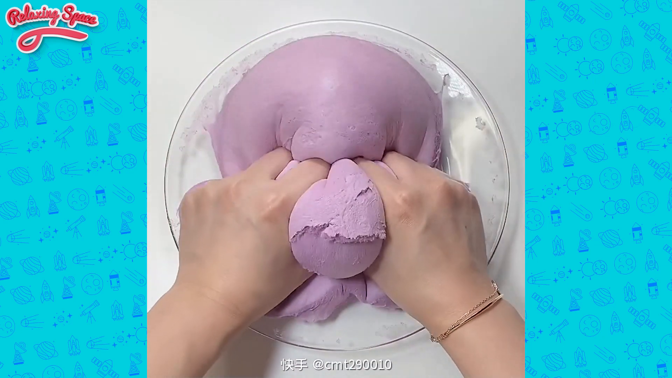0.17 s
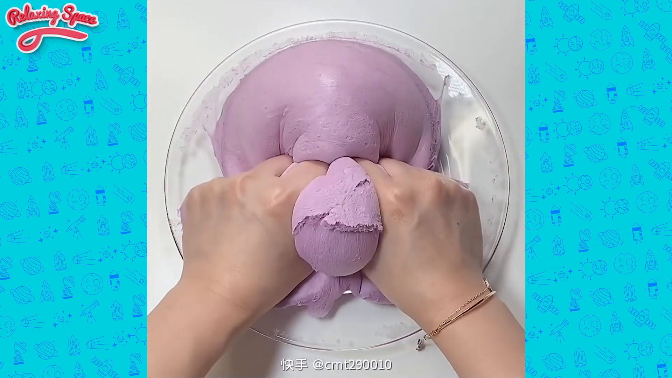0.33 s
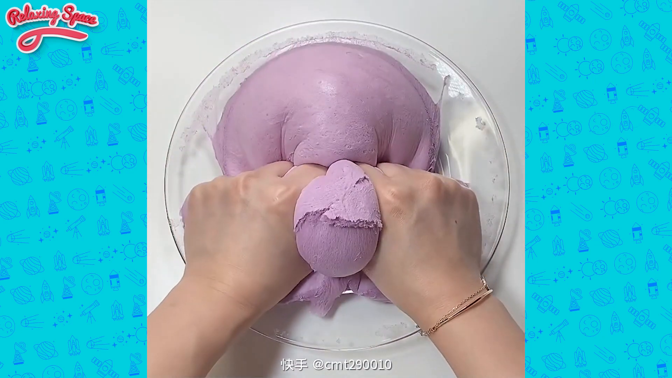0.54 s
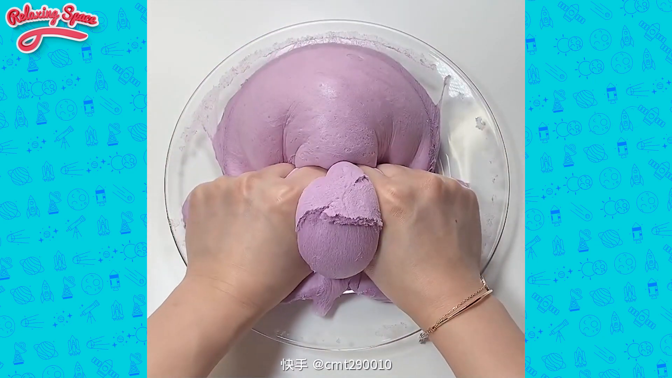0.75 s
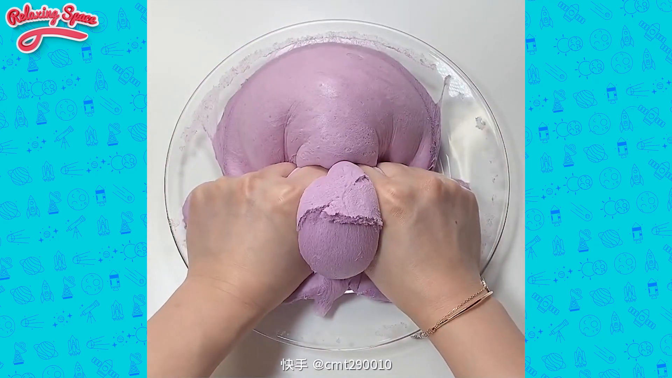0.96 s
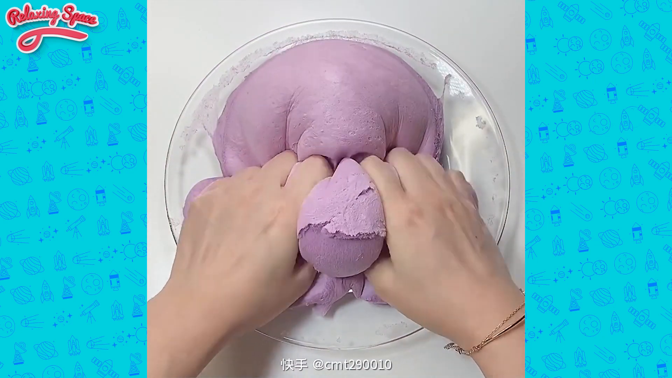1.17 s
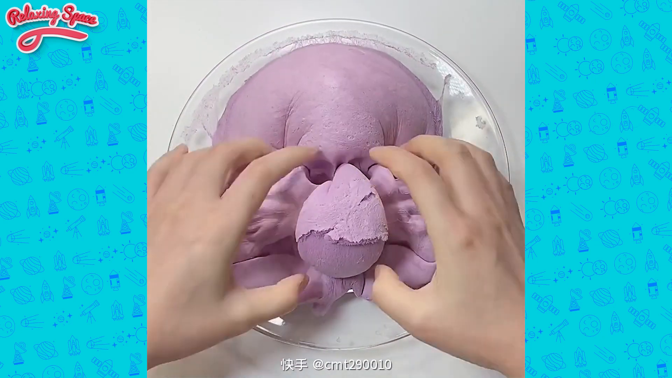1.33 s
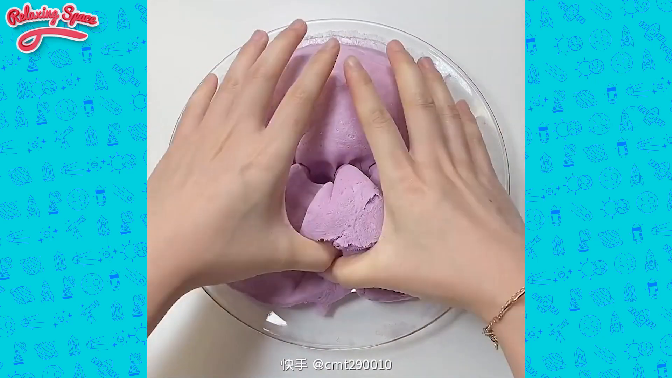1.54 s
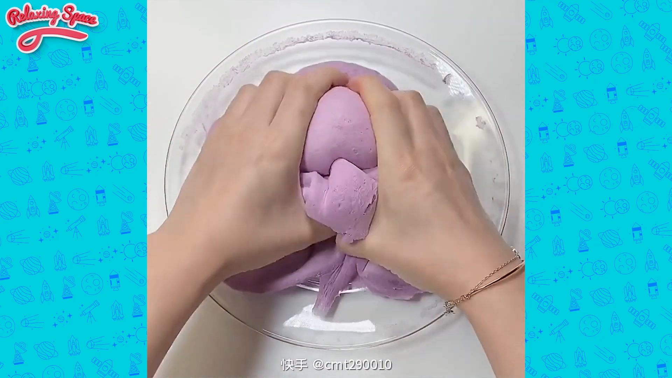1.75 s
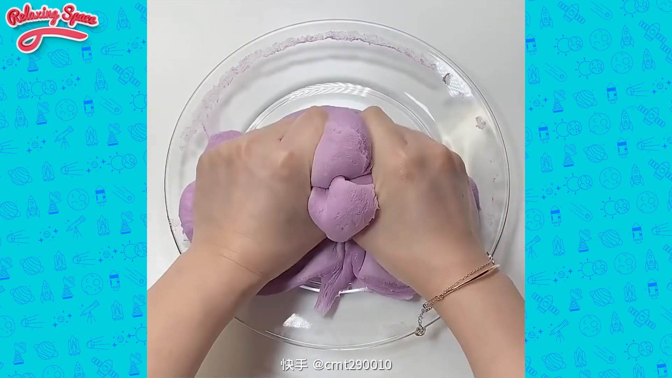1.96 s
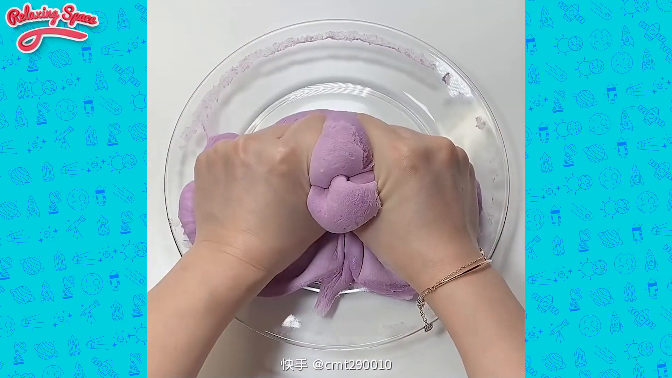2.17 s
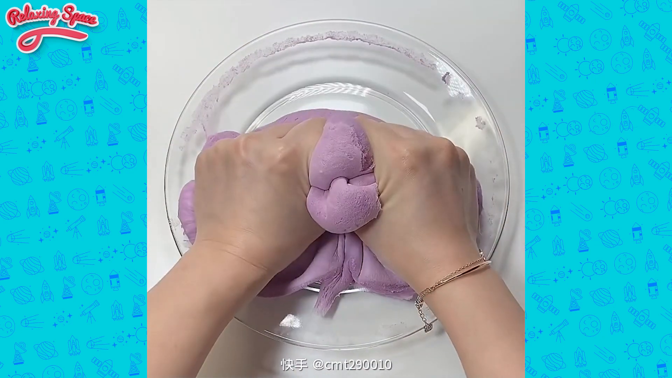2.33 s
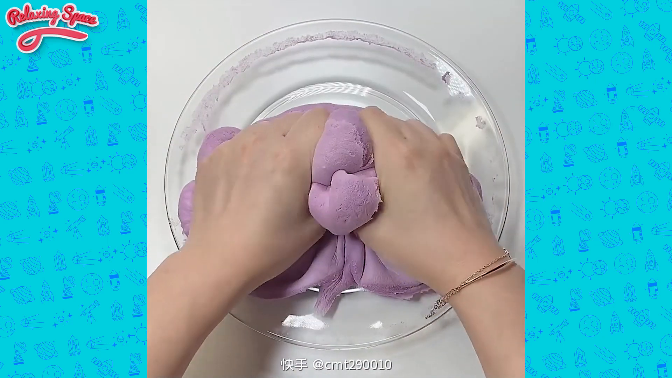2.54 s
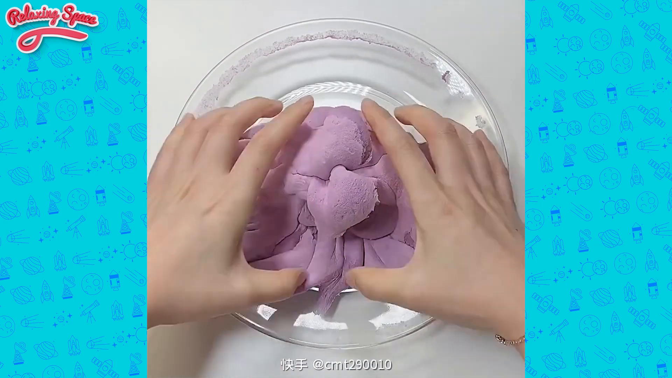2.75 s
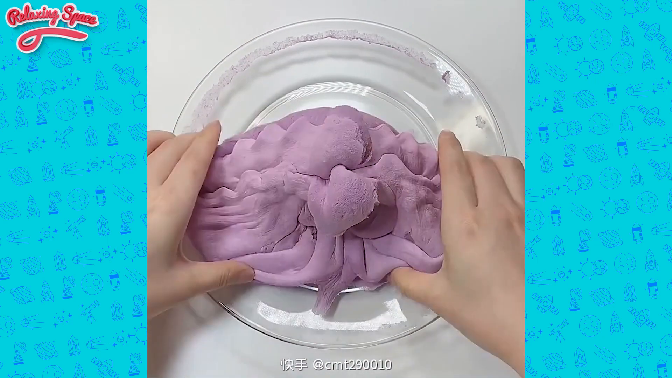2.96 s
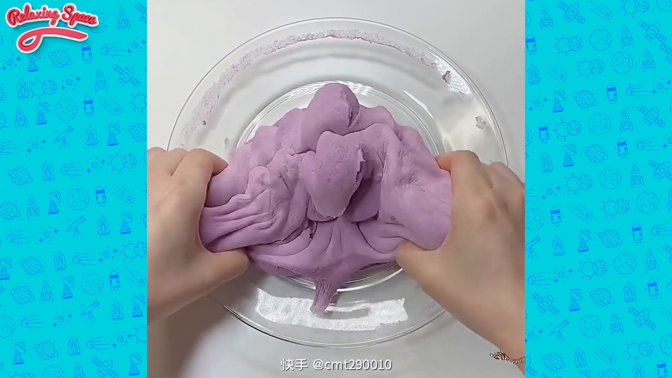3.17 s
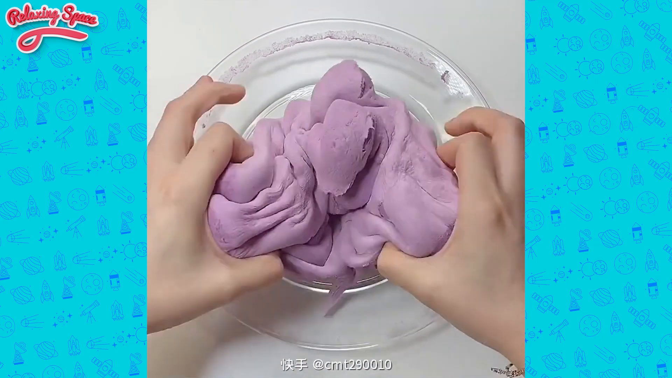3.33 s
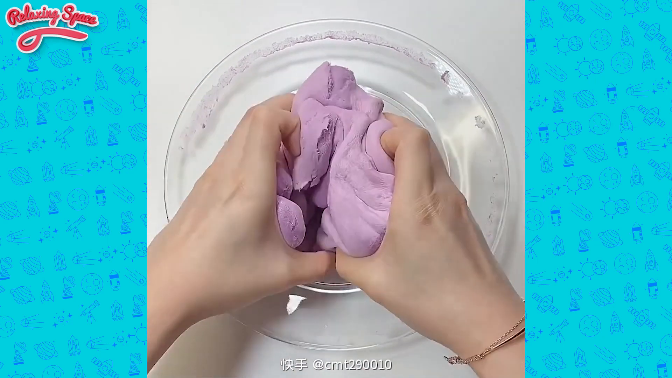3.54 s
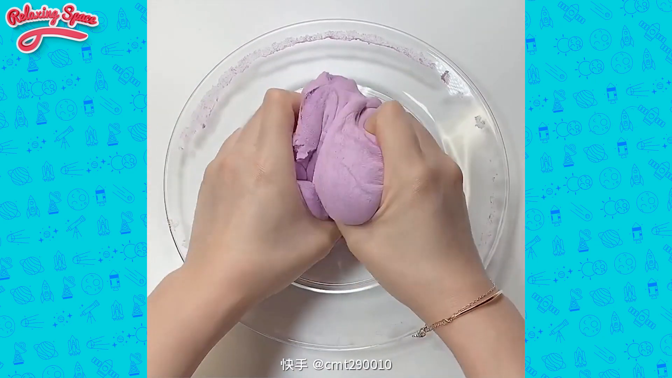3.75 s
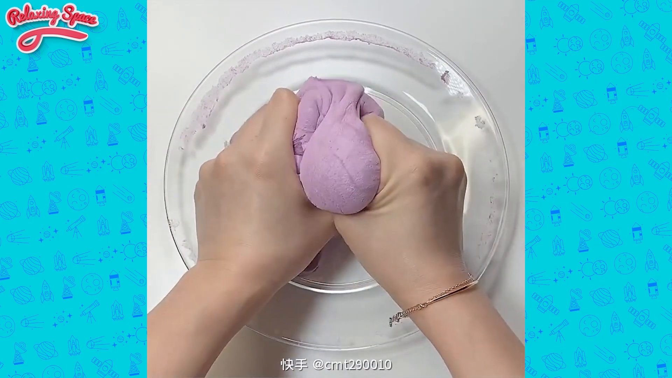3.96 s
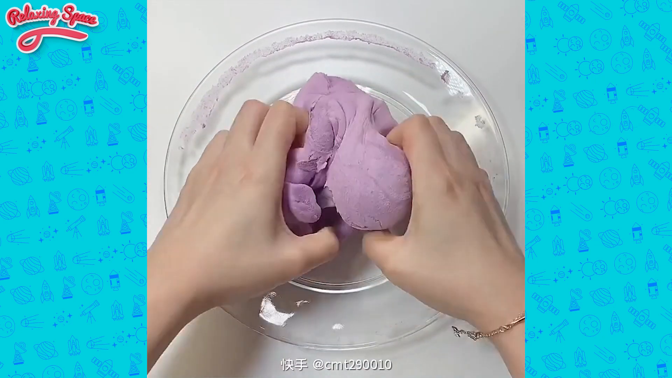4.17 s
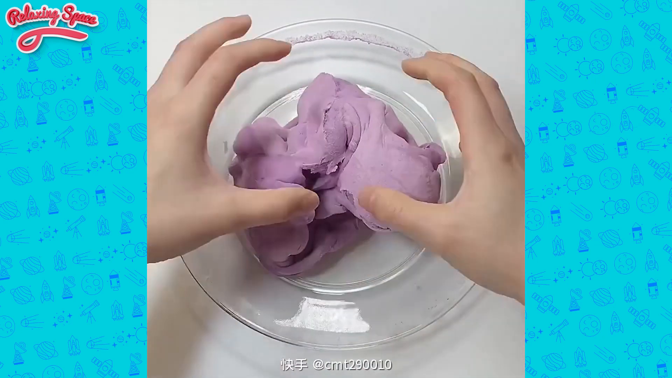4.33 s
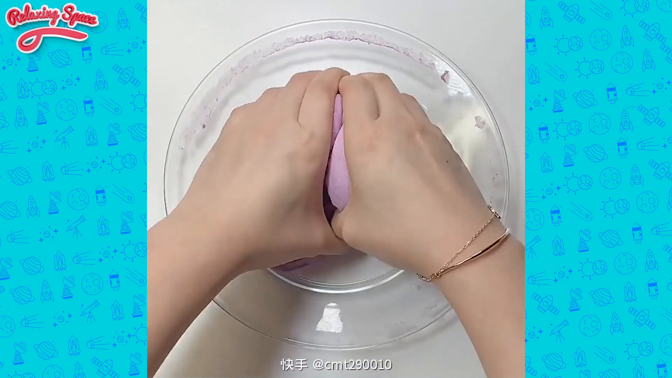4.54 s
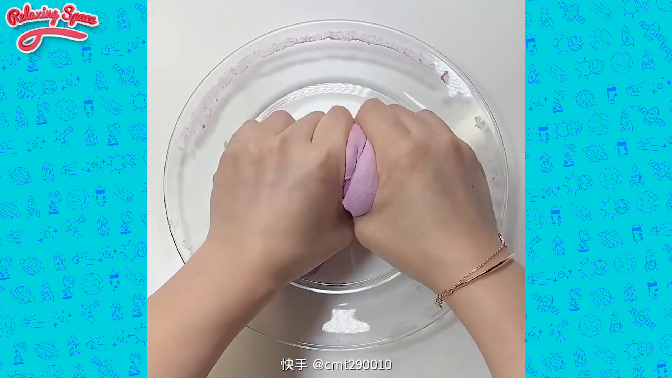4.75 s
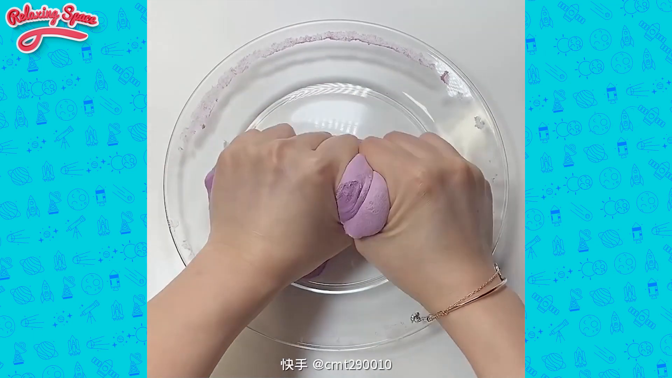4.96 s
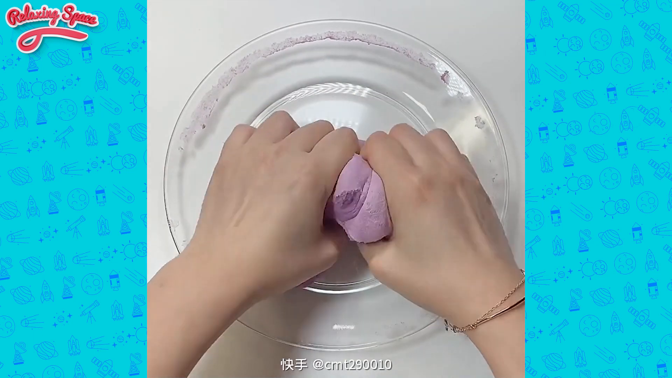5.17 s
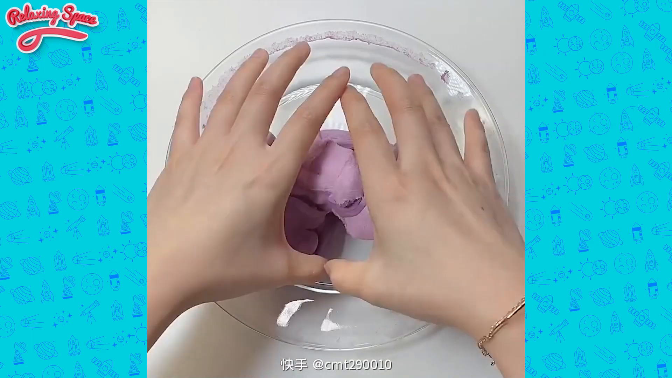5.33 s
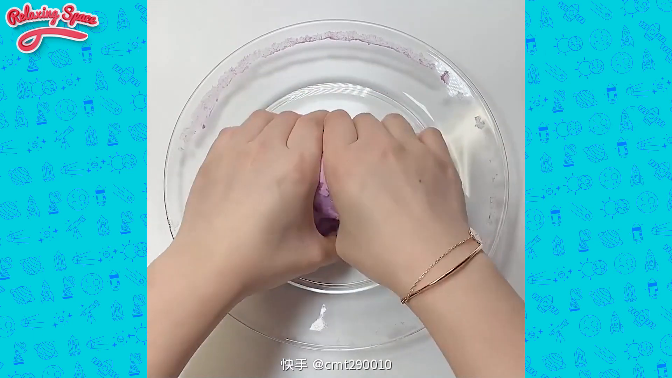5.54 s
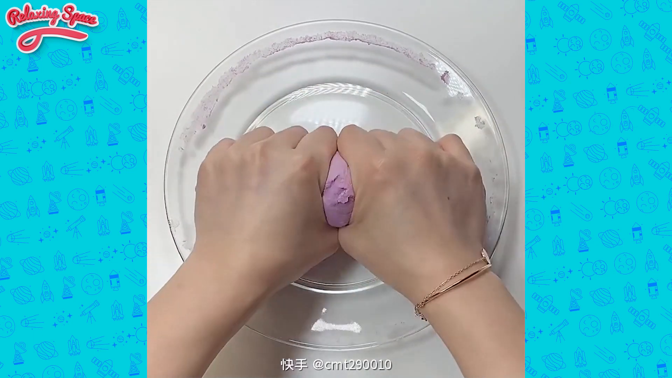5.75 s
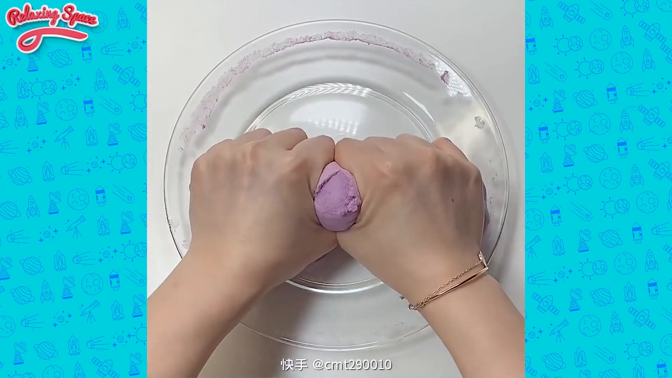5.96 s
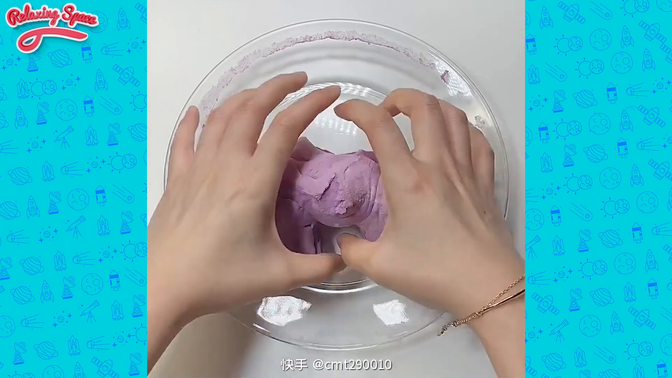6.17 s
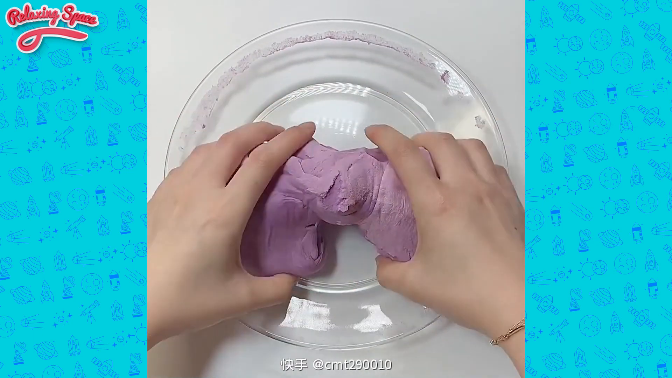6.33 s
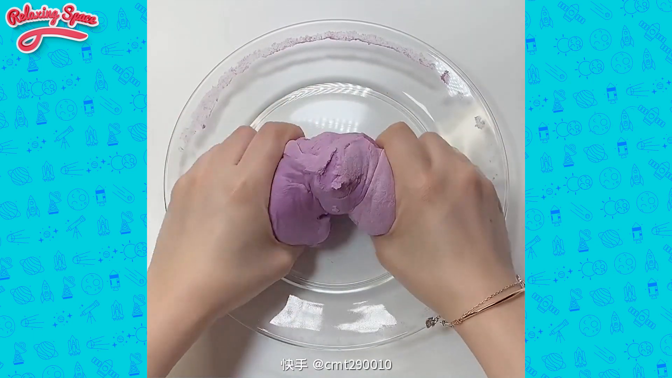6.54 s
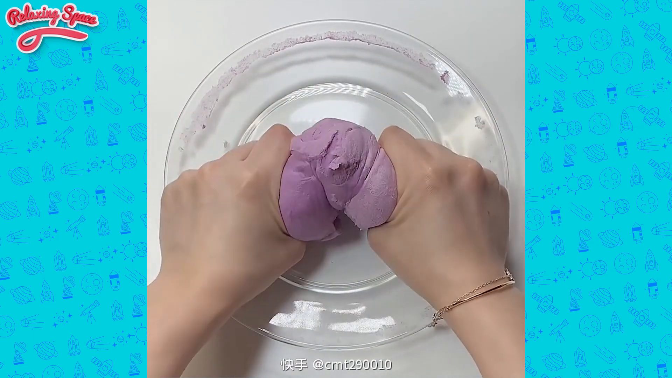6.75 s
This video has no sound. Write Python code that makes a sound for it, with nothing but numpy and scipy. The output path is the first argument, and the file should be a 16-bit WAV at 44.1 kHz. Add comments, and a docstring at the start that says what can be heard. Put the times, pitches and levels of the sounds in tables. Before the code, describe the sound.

Close, dry kneading of puffy slime, with crackly hissing presses, sticky low peels, snapping air pockets and a few damped rattles of the glass plate.

```python
"""Foam fizzes and rasps at once as two hands knead air-puffed slime on a glass plate, over a faint hush.
Filtered random clicks make the bursting cells and the squelch of skin peeling free; filtered noise the table rumble.
Air pockets pop as noise through cavity and slit resonances, and a thin gliding sine whistles from a pinhole.
Lumps land as short sagging sines; jolts of the plate are noise chatter with a sum of decaying glass modes.
A small furnished room adds quick desk echoes and a short tail."""
import sys
import numpy as np
from scipy import signal
from scipy.fft import rfft, irfft
from scipy.io import wavfile
from scipy.ndimage import uniform_filter1d

SR = 44100
rng = np.random.default_rng(int(sys.argv[2]) if len(sys.argv) > 2 else 0)


def persist_wave(psi):
    """Save psi, clipped to +-1, as 16-bit WAV."""
    counts = np.round(np.clip(psi, -1, 1) * 32767).astype(np.int16)
    wavfile.write(sys.argv[1], SR, np.atleast_2d(counts).T)


N = 299880
TIME = np.arange(N) / SR
LET_GO_DB_PER_S = 336.5  # fall of the foam's sound in a release or a finger stir

# The hands close and press. Each row: start in seconds, hold in seconds, then relative levels of fizz (finest
# cells), rasp (coarser cells) and squelch in dB, swell during the hold in dB, dying away in dB per second,
# small air pockets in dB.
SQUEEZES = [(0.0, 0.026, -32.5, -31.5, -36, 1, 38, -48), (1.611, 0.19, -33.5, -35, -41.5, 5.5, 61, -28.5),
            (2.848, 0.24, -39, -44, -48, 4.5, 53.5, -45), (3.48, 0.474, -39.5, -41, -50.5, 1.5, 263, -44.5),
            (4.547, .47, -39, -38.5, -45, 0.5, 52.5, -34.5), (5.535, 0.26, -41, -42, -49.5, 8.5, 86, -37),
            (6.466, 0.15, -37, -38.5, -43.5, 2.5, 54, -36)]
# Slime lands or pulls free. Each row: start in seconds, level in dB before channel balance, nominal pitch in Hz,
# nominal length in seconds.
THUMPS = [(1.198, -27, 182, 0.015), (1.246, -21, 372, 0.024), (1.283, -21.5, 441, 0.019),
          (1.327, -25.5, 58.6, .027), (1.46, -38, 54.4, 0.062), (1.826, -15, 66, 0.012),
          (2.624, -16, 320, 0.019), (2.851, -15.5, 112, 0.019), (3.52, -32, 128, 0.014),
          (4.169, -14.5, 398, 0.0088), (4.193, -15, 385, 0.014), (4.211, -13.5, 129, 0.027),
          (5.171, -21, 362, 0.018), (5.208, -19.5, 323, 0.024), (5.257, -19.5, 400, 0.0092),
          (5.533, -31.5, 203, 0.024), (6.142, -20, 240, 0.025), (6.183, -19, 312, 0.01),
          (6.255, -20, 110, 0.024), (6.321, -12, 199, 0.035), (6.339, -16, 216, 0.021),
          (6.366, -22, 350, 0.021)]
# Stereo difference of foam and chatter. Each row: frequency in Hz, side minus mid in dB.
SPREAD = [(200, -5), (550, -1), (900, 5.5), (1400, -58.5), (2500, -4), (5000, -4.5), (8000, -1),
          (15000, -13.5)]


def undb(db):
    """Decibels to gain."""
    return 10 ** (np.asarray(db) / 20)


def unit(x):
    """Scale to rms 1."""
    return x / np.sqrt(np.mean(x ** 2))


def shape(x, spectrum):
    """Filter by a curve of (Hz, dB) points that falls away beyond its ends."""
    hz, db = np.transpose(spectrum)
    f = np.maximum(np.fft.rfftfreq(x.shape[-1], 1 / SR), 1)
    skirt = np.minimum(f / hz[0], 1) ** 2 * np.minimum(hz[-1] / f, 1) ** 2
    gain = skirt * undb(np.interp(np.log(f), np.log(hz), db))
    return irfft(rfft(x) * gain, x.shape[-1])


def colour(x, spectrum):
    """Give a signal a spectrum, at rms 1."""
    return unit(shape(x, spectrum))


def resonate(x, hz, q):
    """One damped resonance, at rms 1; pitch is capped and q has a floor that rises with pitch."""
    hz = min(hz, .4 * SR)
    b, a = signal.iirpeak(hz, max(q, 2.5 * hz / SR), fs=SR)
    return unit(signal.lfilter(b, a, x))


def add(out, s, sound):
    """Mix a sound in at a time in seconds."""
    i = max(int(s * SR), 0)
    out[..., i:i + sound.shape[-1]] += sound[..., :max(N - i, 0)]


def bursts(rate, spread_db):
    """Random clicks at a rate per second, with exponentially scattered dB sizes."""
    size = undb(spread_db * np.minimum(rng.exponential(size=N), 5))
    sign = rng.choice([-1, 1], N)
    return size * sign * (rng.random(N) < rate / SR)


def walk(rate):
    """Random wander: normal knots at a rate per second, joined by straight lines."""
    knots = rng.standard_normal(4096)
    return np.interp(TIME * rate, np.arange(len(knots)), knots)


def mid_side(mid, side):
    """Two microphones from mid and side, the side shaped by SPREAD."""
    side = shape(side, SPREAD)
    return np.array([mid + side, mid - side])


def widen(x, width, scatter_s):
    """Hands and plate scatter a sound, so that it reaches the two microphones a little differently."""
    t = TIME[:1024]
    scatter = rng.standard_normal(len(t)) * np.exp(-t / scatter_s)
    side = signal.fftconvolve(x, scatter / np.linalg.norm(scatter))[:len(x)]
    return np.array([x + width * side, x - width * side])


def ramp(s, hold, rise_db_per_s, fall_db_per_s):
    """Gain that climbs to 1 at a time, holds, then dies away."""
    rise_db = rise_db_per_s * np.maximum(s - TIME, 0)
    fall_db = fall_db_per_s * np.maximum(TIME - s - hold, 0)
    return undb(-np.minimum(rise_db + fall_db, 150))


def gesture(s, hold, rise_db_per_s, fall_db_per_s, lead_s, lead_db):
    """A move of the hands, announced by a lighter stir of the fingers."""
    stir = ramp(s - lead_s, lead_s, rise_db_per_s, LET_GO_DB_PER_S) * undb(lead_db)
    return np.maximum(stir, ramp(s, hold, rise_db_per_s, fall_db_per_s))


def kneading():
    """How hard the hands work the slime: gains of fizz, rasp, squelch and table rumble, summed in power."""
    # The fingers open and pull out. Each row: start in seconds, hold in seconds, then relative levels of fizz,
    # rasp, squelch and table rumble in dB, and the first slackening relative to the full pull in dB.
    releases = [(1.136, 0.15, -37.5, -34, -28.5, -33, -19), (2.601, 0.096, -38, -32, -24.5, -28.5, -15),
                (3.085, 0.082, -42, -28.5, -30, -30, -9), (3.238, 0.056, -35.5, -33.5, -32, -40, -12),
                (4.134, 0.089, -34.5, -31.5, -25, -39, -9), (5.165, 0.089, -35.5, -32, -31, -34.5, -22),
                (6.092, 0.052, -31, -29, -25, -30, -12)]
    rest_fizz_db, rest_rasp_db, lean_db = -70, -62, -49.5  # foam left alone; arms resting on the table
    grip_db_per_s, touch_s, touch_db = 250, 0.061, -13  # fingers find their grip just before each squeeze
    squelch_steepness, squeeze_rumble_db = 1.49, -3.5  # dB slopes relative to fizz; rumble relative to squelch
    pull_db_per_s, loosen_s = 261, .14  # the grip slackens this long before each release
    rasp_lag_s, rasp_loosen_db = 0.0095, -5.5  # coarse cells follow the fine ones and stir less at first
    unstick_db_per_s, unstuck_db_per_s, squelch_hold = 197.5, 225.5, 0.41  # hold as a share of the release
    shift_lag_s, shift_db_per_s = 0.045, 157  # the hands' weight shifts after mid-release
    impact_db_per_s, settle_db_per_s = 1996, 133
    settle_rumble_db, settle_squelch_db = -12.5, -20  # relative to the thump
    heavy_hz = 173  # thumps below this pitch shake the table fully

    fine, coarse, weight = ([np.full(N, undb(db))] for db in (rest_fizz_db, rest_rasp_db, lean_db))
    peel = []
    for s, hold, fizz_db, rasp_db, squelch_db, swell_db, fall_db_per_s, _ in SQUEEZES:
        press = gesture(s, hold, grip_db_per_s, fall_db_per_s, touch_s, touch_db)
        swell = undb(swell_db * np.clip((TIME - s) / hold, 0, 1))
        fine.append(press * swell * undb(fizz_db))
        coarse.append(press * swell * undb(rasp_db))
        peel.append(press ** squelch_steepness * swell * undb(squelch_db))
        weight.append(press * swell * undb(squelch_db + squeeze_rumble_db))
    for s, hold, fizz_db, rasp_db, squelch_db, rumble_db, loosen_db in releases:
        pull = (hold, pull_db_per_s, LET_GO_DB_PER_S, loosen_s)
        fine.append(gesture(s, *pull, loosen_db) * undb(fizz_db))
        coarse.append(gesture(s + rasp_lag_s, *pull, loosen_db + rasp_loosen_db) * undb(rasp_db))
        middle, stuck = s + hold / 2, hold * squelch_hold
        unstick_at = middle + rasp_lag_s - stuck / 2
        peel.append(ramp(unstick_at, stuck, unstick_db_per_s, unstuck_db_per_s) * undb(squelch_db))
        weight.append(ramp(middle + shift_lag_s, 0, shift_db_per_s, shift_db_per_s) * undb(rumble_db))
    for s, db, hz, length in THUMPS:
        peel.append(ramp(s, length, impact_db_per_s, unstuck_db_per_s) * undb(db + settle_squelch_db))
        heavy = min(heavy_hz / hz, 1) ** 2
        settle = ramp(s, length, impact_db_per_s, settle_db_per_s)
        weight.append(settle * undb(db + settle_rumble_db) * heavy)
    return [np.linalg.norm(parts, axis=0) for parts in (fine, coarse, peel, weight)]


def hush():
    """Faint room air: steady noise with its own spectrum."""
    # Each row: frequency in Hz, relative density in dB per Hz.
    air_spectrum = [(15, -31), (30, 8), (50, 13), (86, 3), (450, -5), (558, -28), (2130, -14), (4750, -81),
                    (5720, -18), (9270, -82), (12400, -25), (15000, -9.5)]
    air = colour(rng.standard_normal(N), air_spectrum)
    return widen(air, width=0.5, scatter_s=.008) * undb(-56.5)


def cells(rate, spread_db, spectrum):
    """A cloud of bursting cells, spread over the whole lump between the two hands."""
    mid, side = (colour(bursts(rate, spread_db) / np.sqrt(rate), spectrum) for _ in range(2))
    return mid_side(mid, side)


def foam(fine, coarse):
    """Cells burst by the thousand, the more the harder the squeeze, in uneven surges; some tick and crackle."""
    # Each row: frequency in Hz, relative density in dB per Hz.
    fine_spectrum = [(2500, -29.5), (4000, 2.5), (4900, -1.5), (6200, 3), (9000, -3.5), (12000, 1),
                     (14000, -1.5), (16000, -5.5)]
    coarse_spectrum = [(300, -2), (700, -5.5), (1200, -3), (1700, 0.5), (2300, 2), (3100, -1),
                       (4200, -10.5), (7000, -11.5)]
    pressure = np.sqrt(fine / fine.max())
    surge = undb(1.0 * walk(rate=49))
    fizz = cells(2000 + 12000 * pressure, spread_db=-1.0, spectrum=fine_spectrum)
    rasp = cells(1800 + 7000 * pressure, spread_db=0.0, spectrum=coarse_spectrum)
    ticks = cells(60 + 150 * pressure, spread_db=5.5, spectrum=fine_spectrum)
    crackle = cells(120 + 300 * pressure, spread_db=4.5, spectrum=coarse_spectrum)
    fine_foam = (fizz * undb(-1.0) + ticks * undb(-11.5)) * fine
    coarse_foam = (rasp * undb(-1.2) + crackle * undb(-8)) * coarse
    return surge * (fine_foam + coarse_foam)


def squelch(peel):
    """Sticky skin lets go in small jerks that come in bunches, each opening a soft, low cavity."""
    # Each row: frequency in Hz, relative density in dB per Hz.
    jerk_spectrum = [(70, 1), (140, -8), (210, 0.5), (300, 1), (420, 1.5), (600, -8.5), (850, -11.5),
                     (1400, -12), (2600, -30)]
    bunching = undb(3.2 * walk(rate=80))
    jerks = colour(bursts(rate=800, spread_db=1.8), jerk_spectrum) * bunching
    balance = undb(np.array([[-1.6], [1.2]]))
    return widen(jerks * peel * undb(-1.5), width=0.14, scatter_s=0.00036) * balance


def heave(weight):
    """The table rumbles under the shifting hands: low noise that follows their weight."""
    # Each row: frequency in Hz, relative density in dB per Hz.
    table_spectrum = [(20, -45.5), (35, -14), (52, 1), (85, 1), (130, -2), (200, -11), (400, -26),
                      (900, -62)]
    rumble = colour(rng.standard_normal(N), table_spectrum)
    return widen(rumble * weight * undb(0.5), width=0.24, scatter_s=0.011)


def small_pops():
    """Little pockets of varied size give way at uneven moments in every squeeze; rows as for large pops."""
    pockets_per_s, scatter_db = 36, 4.5
    usual_cavity_hz, usual_spray_hz, length_s = 2530, 6800, .0015
    rows = []
    for s, hold, *_, db in SQUEEZES:
        ages = (np.arange(20) + rng.random(20)) / pockets_per_s
        for age, (cavity, spray, size) in zip(ages, rng.standard_normal((20, 3))):
            if age < hold:
                pitch = np.exp(0.13 * size)
                cavity_db = db - 1 + scatter_db * cavity
                spray_db = db + scatter_db * spray
                rows.append((s + age, cavity_db, usual_cavity_hz * pitch,
                             spray_db, usual_spray_hz * pitch, length_s))
    return rows


def pops():
    """A pocket tears open: the outflow rings its cavity and sprays through the slit, then dies quickly."""
    # Large pockets. Each row: start in seconds, cavity level in dB, cavity pitch in Hz, spray level in dB,
    # spray pitch in Hz, nominal outflow length in seconds. Levels are relative.
    large_pockets = [(0.815, -45.5, 500, -49, 7190, 0.0013), (0.985, -48, 1820, -43, 7300, 0.0013),
                     (1.813, -18, 1310, -24, 4560, 0.0093), (1.968, -29.5, 950, -51, 4490, .0044),
                     (2.6255, -16, 590, -32.5, 4600, 0.0032), (2.6795, -15, 1090, -55, 4000, 0.0042),
                     (3.466, -36, 2060, -32, 5420, 0.0018), (3.6838, -30, 2760, -23, 10300, 0.00094),
                     (3.904, -42, 1570, -21.5, 13700, 0.0021), (3.9131, -23.5, 1320, -18, 4800, 0.0028),
                     (3.921, -22, 400, -22, 6160, .0017), (3.941, -31.5, 3215, -24.5, 6480, 0.0023),
                     (4.1895, -23, 590, -18, 3640, 0.0017), (4.7585, -17.5, 2450, -23, 3960, 0.0014),
                     (4.79, -36, 2870, -29, 6460, .005), (4.8594, -29, 2640, -22.5, 6430, 0.002),
                     (4.975, -2.5, 1930, -2.5, 12520, 0.0012), (4.978, -10, 363.2, -17.5, 13800, 0.0021),
                     (4.99, -22.5, 2400, -27, 10600, 0.005), (5.495, -39, 3300, -34.5, 4670, 0.0014),
                     (5.635, -28, 2070, -39, 7680, 0.0015), (5.656, -24, 2370, -14, 11100, 0.0034),
                     (5.6978, -28, 2280, -20.5, 11200, 0.0032), (5.7143, -32, 2350, -20.5, 11200, 0.0058),
                     (5.767, -22, 2250, -16, 12900, 0.0055), (5.8172, -31, 2940, -24, 6120, .004),
                     (5.862, -17, 2360, -16.5, 6350, 0.0015), (5.874, -17, 2470, -9, 11400, 0.0049),
                     (5.89, -22, 2270, -16, 11700, 0.0072), (6.1175, -21, 444, -26.5, 4050, 0.0051),
                     (6.3985, -43, 400, -27.5, 6070, 0.0011), (6.498, -18, 1410, -21.5, 4000, 0.0018),
                     (6.597, -16.5, 2960, -19, 6300, 0.0054), (6.6443, -19.5, 2900, -16, 9300, 0.0039),
                     (6.773, -16, 2280, -12, 5830, 0.0017)]
    out, t = np.zeros((2, N)), TIME[:4096]
    for s, cavity_db, cavity_hz, spray_db, spray_hz, length in large_pockets + small_pops():
        half = length / 2
        flow = np.exp(-np.abs((t - half) / half) ** 0.55)
        flow += undb(-13.5) * np.exp(-t / 0.0065)  # faint tail
        flow *= 1 - np.exp(-t / 0.00017)  # onset
        air = rng.standard_normal((2, len(t)))
        cavity = resonate(resonate(air[0], cavity_hz, q=1.6), cavity_hz, q=0.87) * undb(cavity_db)
        spray = resonate(resonate(air[1], spray_hz, q=1.38), spray_hz, q=0.66) * undb(spray_db)
        add(out, s, widen(flow * cavity, width=0.13, scatter_s=.002))
        add(out, s, widen(flow * spray, width=0.71, scatter_s=0.0016))
    return out * undb(2.5)


def whistle():
    """Air through a pinhole: a thin, unsteady whistle that sinks as the pocket empties."""
    # Start in seconds, length in seconds, first and last mean pitch in Hz, level in dB before flutter.
    pinhole = (.23, .055, 12300, 11400, -39)
    out, t = np.zeros((2, N)), TIME[:4096]
    s, length, first_hz, last_hz, db = pinhole
    hz = np.interp(t, [0, length], [first_hz, last_hz]) + 250 * walk(rate=900)[:len(t)]
    flutter = undb(6 * walk(rate=400)[:len(t)])
    flow = np.interp(t / length, [0, .1, 1], [0, 1, 0]) * flutter
    add(out, s, undb(db) * flow * np.sin(2 * np.pi * np.cumsum(hz) / SR))
    return out


def thumps():
    """A soft mass lands or lets go: a brief tone whose pitch sags as the slime spreads, plus a resonant slap."""
    out, t = np.zeros(N), TIME[:12000]
    for s, db, hz, length in THUMPS:
        age = t / (length * 0.28)
        sagging_hz = hz * (0.932 + 0.14 * np.exp(-age / 2))
        tone = np.sin(2 * np.pi * np.cumsum(sagging_hz) / SR)
        slap = resonate(rng.standard_normal(len(t)), hz * 1.7, q=7.1)
        swell = age * np.exp(1 - age)
        add(out, s, undb(db) * swell * (tone + 0.25 * slap))
    return out * undb(np.array([[-1.3], [.8]]))


def plate():
    """Each jolt is a quick chatter of glass contacts and a ring that the slime soon damps."""
    # Each row: start in seconds, ring level in dB, chatter level in dB, freedom to ring (0 smothered, 1 free),
    # place (0 damped side, 1 free rim).
    jolts = [(1.8655, -4.5, -16.5, 0.39, 0), (1.936, -21.5, -41, 0.29, 0.097),
             (1.951, -22.5, -38, 0.31, 0.22), (2.0127, -21, -46, 0.32, 0), (2.844, -23.5, -30, 0.2, 0.13),
             (4.8919, -9.5, -12.5, 0.77, 1), (4.9069, -23, -20, 0.9, 0.45), (5.738, -14.5, -13, 0.67, 0.7),
             (5.836, -16.5, -22, 0.51, 0.44), (5.992, -15.5, -13.5, 0.51, 0.51),
             (6.0195, -17.5, -23, 0.59, 0.41), (6.2456, -37.5, -34, 1, .1),
             (6.3164, -29.5, -24.5, 0.94, 0.98), (6.5109, -6, -8.5, 0.91, 0.59),
             (6.5373, -11.5, -9.5, 0.61, 0.92), (6.562, -8.5, -13, 0.68, 0.85),
             (6.576, -14, -18, 0.85, 0.15), (6.743, -21.5, -33, .19, 0.0078)]
    # Each row: mode in Hz, relative dB jolted on the damped side, relative dB at the free rim, free t60 in seconds.
    modes = [(790, -28, -16, .22), (1576, -16, -10, .34), (2005, -7, -5, .1), (2380, -6, 1, .52),
             (2525, -14, -10, .1), (3250, 0, -6, .18), (3312, -8, -11, .18), (4275, -5, -5, .24),
             (4344, -11, -11, .15), (5450, 1, -7, .26), (5990, -12, -16, .1), (6749, -11, -4, .28),
             (8203, -10, -9, .2), (10160, -12, -16, .15), (10478, -8, -16, .15), (11652, -5, -5, .22),
             (12340, -11, -11, .1), (12953, -8, -12, .22), (13609, -14, -4, .18), (14299, -11, -11, .18)]
    # Each row: frequency in Hz, relative density in dB per Hz.
    chatter_spectrum = [(600, -6.5), (1500, -18), (2050, 14.5), (3200, -3), (3800, -2.5), (4300, 9),
                        (4900, -9.5), (5600, 9.5), (7500, -5), (9200, -18), (10300, 7), (11800, 0.5),
                        (15500, -12)]
    rise_s, hard_jolt_db = 0.0017, -15
    softening = 0.36  # treble tilt above 2 kHz, dB per octave per dB of ring below (loss) or above (gain) a hard jolt

    out, t = np.zeros((2, N)), TIME[:17640]
    hz, damped_db, rim_db, t60 = np.transpose(modes)[:, :, None]
    # each mode radiates in its own pattern, so its phase differs between the microphones
    skew = rng.choice([-1, 1], hz.shape) * np.minimum(hz / 8000, .35)
    for s, ring_db, chatter_db, free, place in jolts:
        soft_db = softening * (hard_jolt_db - ring_db)
        place = np.clip(place, 0, 1)
        place_db = damped_db + place * (rim_db - damped_db)
        size = undb(place_db - soft_db * np.log2(np.maximum(hz / 2000, 1)))
        # slime pressed against the glass adds the same loss to every mode
        loss = 1 / t60 + 4.2 * (1 / np.clip(free, .1, 1) - 1)
        decay = size / np.linalg.norm(size) * np.exp(-np.log(1000) * t * loss)
        # while the plate still buzzes on the table, contacts nudge each mode's level and phase
        nudge = unit(uniform_filter1d(rng.standard_normal((2, len(hz), len(t))), size=160))
        nudge *= np.exp(-t / .03)
        decay = decay * undb(2.4 * nudge[0])
        phase = 2 * np.pi * (hz * t + rng.random(hz.shape)) + 0.26 * nudge[1]
        ring = np.array([np.sum(decay * np.sin(phase + way * skew), axis=0) for way in (1, -1)])
        ring *= np.sqrt(2)
        contact = [(f, db - soft_db * np.log2(max(f / 2000, 1))) for f, db in chatter_spectrum]
        mid, side = colour(rng.laplace(size=(2, len(t))), contact) * np.exp(-t / 0.0086)
        chatter = mid_side(mid, side)
        onset = 1 - np.exp(-t / rise_s)
        add(out, s, (undb(ring_db) * ring + undb(chatter_db) * chatter) * onset)
    return out


def reflections(x):
    """Quick echoes from the desk, then the short tail of a furnished room."""
    room_t60_s, room_db, desk_db = 0.3, -13.5, -13
    t = TIME[:22050]
    noise = rng.standard_normal((2, 2, len(t))) * (t > .002)
    desk = unit(noise[0] * np.exp(-t / 0.0043)) * undb(desk_db)
    walls = colour(noise[1], [(60, 6), (2500, -7.0), (8000, 0.5), (16000, -5.5)])  # (Hz, dB)
    tail = np.exp(-np.log(1000) * t / room_t60_s) * (1 - np.exp(-t / 0.0058))
    walls = unit(walls * tail) * undb(room_db)
    return signal.fftconvolve(x, (desk + walls) / np.sqrt(len(t)), axes=1)[:, :N]


def scene():
    """The kneading in its room, over a faint hush; the plate sounds drier than the slime."""
    plate_room_db = -8
    fine, coarse, peel, weight = kneading()
    air = hush()
    slime = foam(fine, coarse) + squelch(peel) + pops() + whistle()
    glass = plate()
    room = reflections(slime + glass * undb(plate_room_db))
    return slime + glass + room + thumps() + heave(weight) + air


def record(dry):
    """Sound reaches the right microphone a moment later; the sharpest peaks clip, and the top is cut."""
    lag_s, top_hz = 1.2e-5, 15900
    delay = np.exp(-2j * np.pi * np.fft.rfftfreq(N, 1 / SR) * lag_s)
    right = irfft(rfft(dry[1]) * delay, N)
    clipped = np.clip([dry[0], right], -1, 1)
    lowpass = signal.ellip(10, .2, 80, top_hz, fs=SR, output="sos")
    return signal.sosfilt(lowpass, clipped)


dry = scene()
out = record(dry)
persist_wave(out)
```